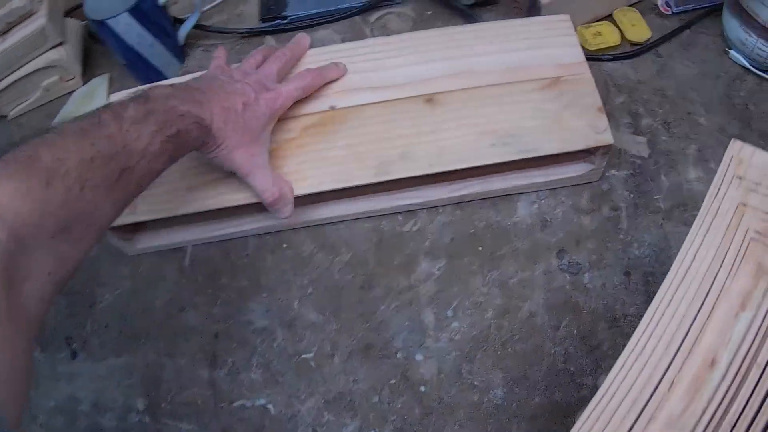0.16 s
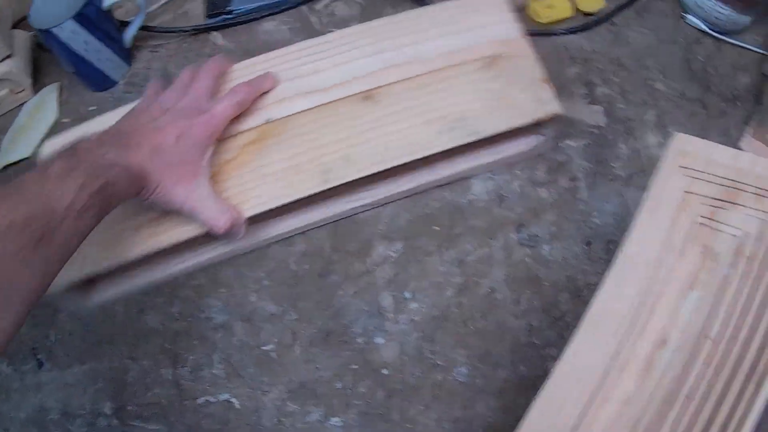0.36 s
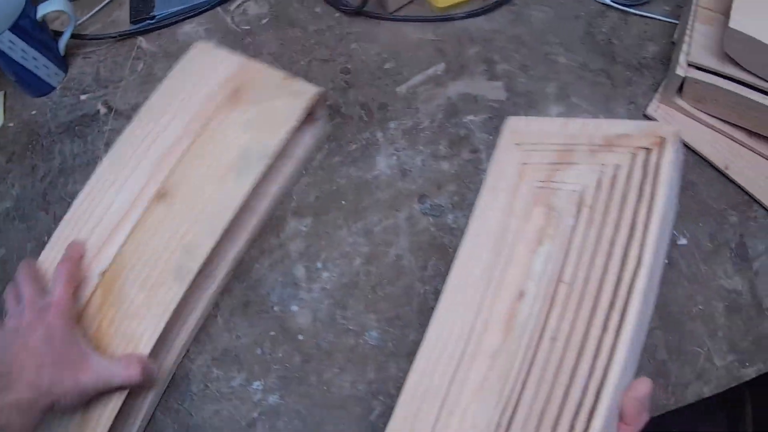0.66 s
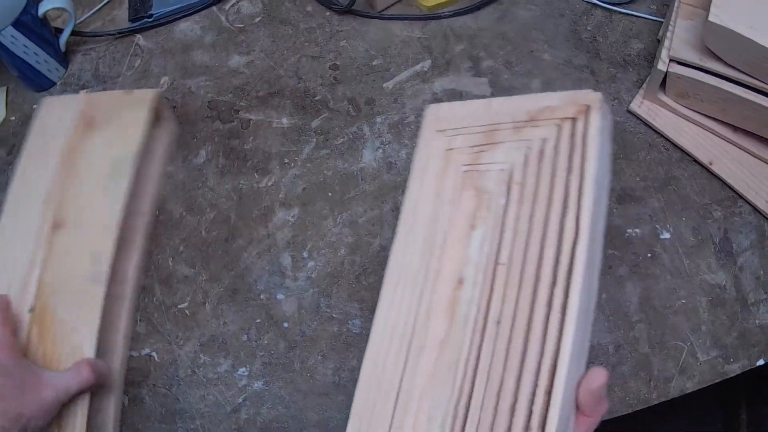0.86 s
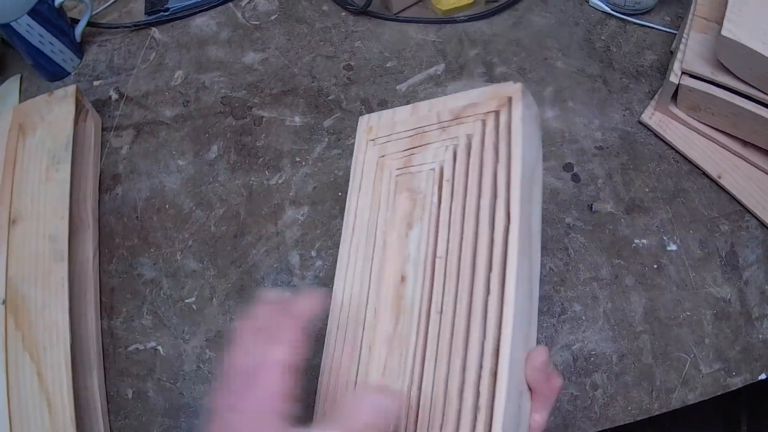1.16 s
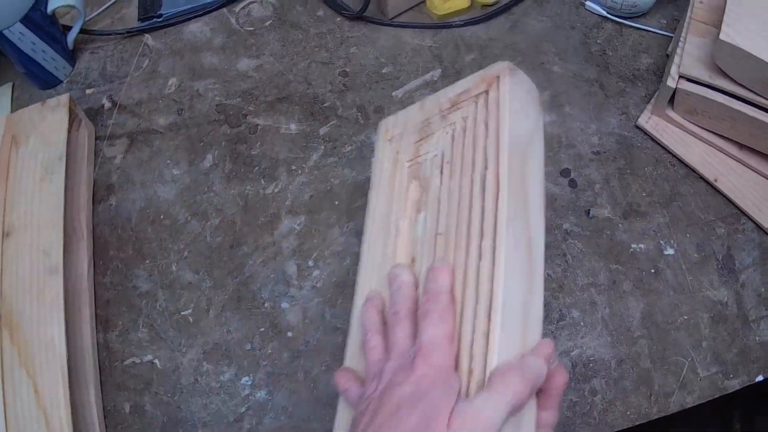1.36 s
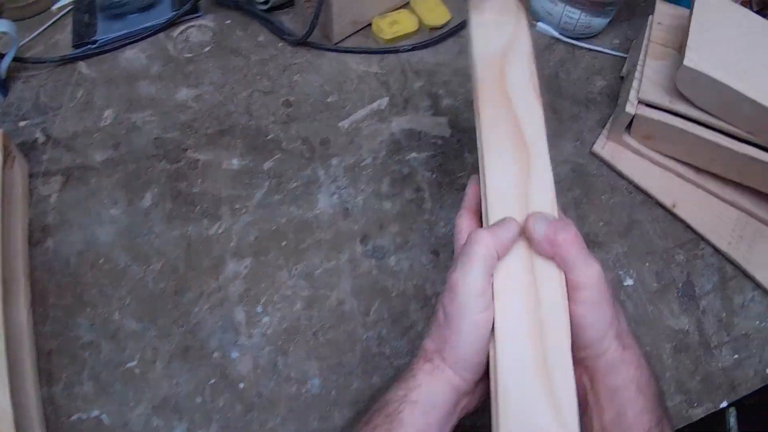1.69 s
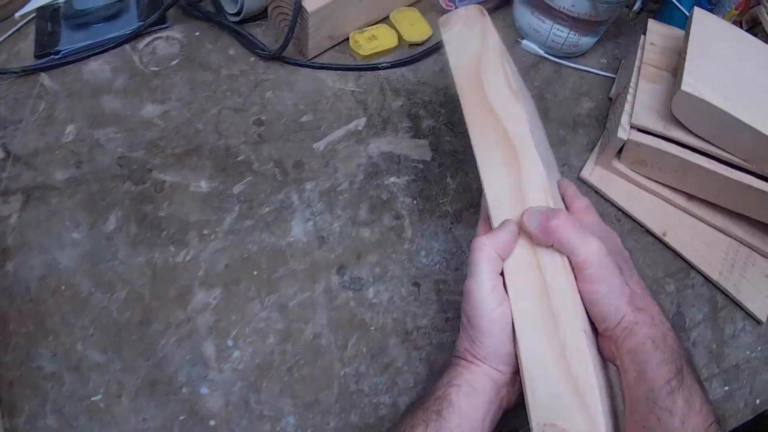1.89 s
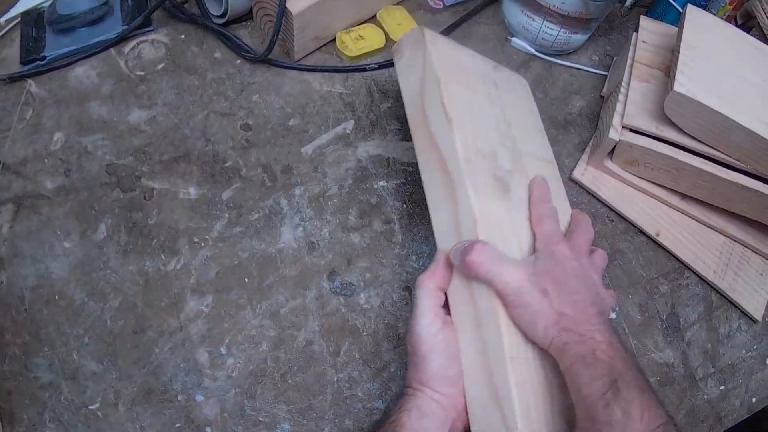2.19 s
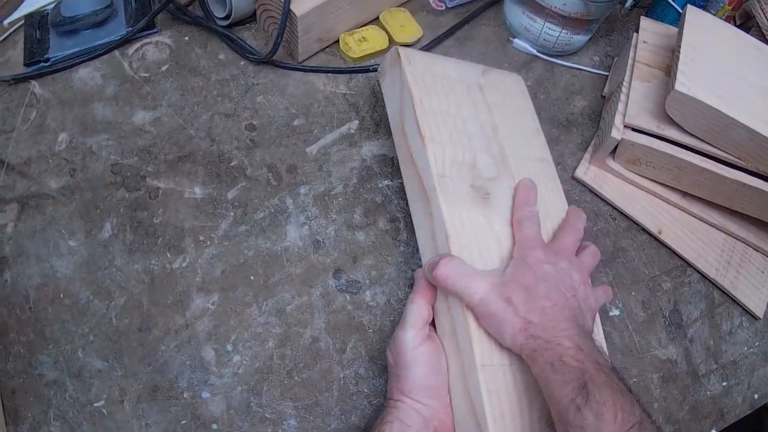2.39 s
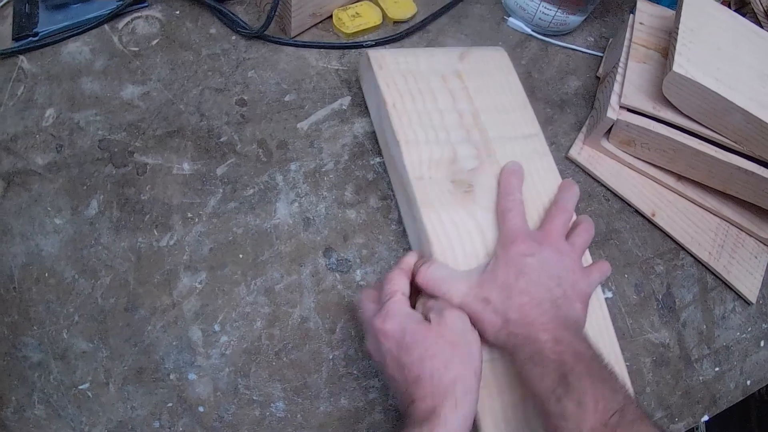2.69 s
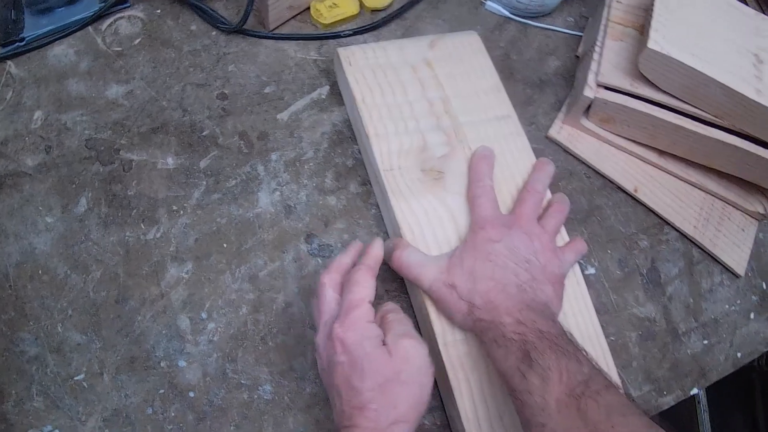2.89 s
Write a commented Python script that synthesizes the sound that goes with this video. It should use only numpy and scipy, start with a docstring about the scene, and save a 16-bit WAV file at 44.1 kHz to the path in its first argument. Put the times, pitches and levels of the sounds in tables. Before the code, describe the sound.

Wood scrapes and knocks on a workbench, close up in a small, fairly dry workshop. A hollow tray chatters along as a stack of trays swishes nearer; the stack is tipped with two knocks, skids, and claps down loudly.

```python
"""A small, fairly dry workshop, one microphone close to a gritty workbench.
A hollow wooden tray is dragged across it, groaning, chattering and bumping, while a solid stack of
trays is drawn closer with a swish. Hands brush the wood. The stack is tipped on edge with two knocks,
skids, and falls flat with a loud clap that leaves a tool ringing faintly.
Still air and a faint electrical whine lie behind it all."""
import sys
import numpy as np
from scipy import signal
from scipy.fft import rfft, irfft
from scipy.io import wavfile
from scipy.ndimage import uniform_filter1d

SR = 44100
rng = np.random.default_rng(int(sys.argv[2]) if len(sys.argv) > 2 else 0)


def pcm_store(signal):
    """Save signal as 16-bit PCM."""
    levels = np.round(np.clip(np.atleast_2d(signal), -1, 1) * 32767)
    wavfile.write(sys.argv[1], SR, levels.astype(np.int16).T)


N = 134505

# modes of the hollow tray and of the solid stack: f/Hz, relative level/dB, t60/s
TRAY_MODES = [(119, -9, .2), (172, -9, .14), (237, -6, .14), (280, -7, .26), (370, -4, .36), (415, -4, .1),
              (447, -3, .11), (480, -8, .2), (585, -8, .19), (740, -15, .13), (1172, -5, .11),
              (1420, -10, .11), (1720, -10, .11), (1945, -16, .1)]
STACK_MODES = [(63, -17, .25), (124, -3, .2), (169, -5, .17), (267, 2, .125), (383, -1, .13), (478, 4, .14),
               (567, -5, .14), (653, -15, .07), (792, -13, .06), (950, -9, .06), (1105, -5, .07),
               (1310, -9, .07), (1450, -9, .08), (1750, -14, .09)]
# blows on the bench: t/s, thump/dB, boom/dB, body/dB, clack/dB, tick/dB, ring length factor
TRAY_BUMPS = [(.107, -63, -67, -49, -66, -78, 0.48), (.355, -56, -49.5, -38.5, -56, -52, 0.46),
              (.434, -59, -58, -35, -66, -75, 0.25), (.446, -50, -43, -33, -47, -59, 0.47),
              (.486, -58, -41, -40.5, -47, -59, 0.27), (.534, -64, -34, -31.5, -51, -70, 0.7),
              (.553, -46, -62, -69, -65, -71, 2.2), (.572, -61, -40, -36.5, -59, -51.5, 1.55),
              (.615, -56, -42, -47.5, -54, -51, 1.2), (.655, -66, -39.5, -33.5, -41.5, -53, 0.47),
              (.709, -43, -68, -32, -54, -62, 1.1), (.724, -53, -46, -30, -44.5, -57, 0.79),
              (.737, -38.5, -30.5, -32, -44, -55.5, 0.61), (.813, -53, -44, -48, -51, -72, 0.55),
              (.855, -50.5, -38.5, -44, -49, -93, 1.18), (.903, -51, -45, -33, -42.5, -44.5, 0.75),
              (1.012, -52, -36, -43.5, -64, -60.5, 0.71), (1.05, -46, -57, -46, -72, -65, 0.58),
              (1.106, -58, -52.5, -54.5, -58.5, -62, 0.82)]
STACK_KNOCKS = [(1.276, -70, -68, -58, -58.5, -72, 0.52), (1.877, -44.5, -34, -34.5, -34, -64, 0.35),
                (1.8805, -39.5, -28, -31.5, -31.5, -50, 0.77), (1.958, -51, -55, -43.5, -69, -76, 0.74),
                (2.002, -64, -56, -46.5, -62, -70, 0.23), (2.029, -57, -80, -38.5, -46, -53.5, 1.4),
                (2.036, -39, -38.5, -32.5, -33.5, -50.5, 0.46), (2.14, -58, -59, -53, -70, -74, 0.38),
                (2.335, -83, -80, -55, -54.5, -60, 1), (2.421, -88, -66, -45.5, -39.5, -90, 0.66),
                (2.468, -74, -56, -62, -75, -70, 1.35), (2.536, -70, -82, -54, -59, -79, 0.75),
                (2.575, -74, -55, -44.5, -46.5, -72, 0.85), (2.622, -77, -56, -45, -44, -53.5, 1.1),
                (2.7195, -51, -50, -34.5, -33.5, -41, 0.94), (2.732, -54, -44.5, -37, -32, -53.5, 1.08),
                (2.7685, -51, -62, -42, -28, -41.5, 0.85), (2.7705, -25, -20, -16, -24.5, -43.5, 0.58),
                (2.886, -72, -56, -42.5, -60.5, -93, 0.36)]
# borders between thump, boom, body, clack and tick: f/Hz
REGISTER_BORDERS = [190, 320, 700, 2400]
# the tray slides: t/s, rumble/dB, grit/dB
DRAG_LEVELS = [(.09, -53, -80), (.115, -72, -58.5), (.155, -50.5, -54.5), (.19, -70, -70), (.26, -74, -82),
               (.29, -63.5, -52.5), (.36, -49, -49.5), (.47, -46, -44), (.65, -41.5, -49),
               (.76, -54, -54.5), (.92, -49, -54.5), (1.0, -50, -60), (1.1, -83, -59.5), (1.14, -72, -100)]

# course of each rubbing sound: t/s, level/dB
GROAN_LEVEL = [(.265, -79), (.285, -49), (.31, -53), (.33, -34.5), (.345, -50), (.365, -40.5),
               (.395, -52.5), (.44, -34.5), (.47, -47), (.49, -31.5), (.515, -46), (.56, -32.5), (.61, -48),
               (.68, -52)]  # the tray's rim sticks and slips
SWISH_LEVEL = [(.6, -71), (.78, -53.5), (.87, -57), (.93, -49), (.97, -58), (1.05, -65.5), (1.13, -79)]  # the stack slides on its face
SKID_LEVEL = [(1.88, -67), (1.92, -53), (2.02, -50), (2.1, -62.5), (2.15, -56.5), (2.26, -53.5),
              (2.36, -52.5), (2.44, -58), (2.5, -63.5), (2.535, -60.5), (2.56, -50), (2.63, -44),
              (2.68, -36), (2.712, -42), (2.725, -37), (2.742, -35.5), (2.765, -51), (2.79, -77)]  # the stack skids on its edge
PALM_LEVEL = [(0, -68), (.06, -67), (.2, -75), (1.26, -95), (1.3, -62), (1.38, -56.5), (1.45, -67),
              (1.5, -65.5), (1.57, -59.5), (1.64, -69), (1.78, -73.5), (1.86, -73)]  # palms brush the wood
FINGER_LEVEL = [(1.6, -69), (1.68, -62.5), (1.78, -68), (1.87, -64.5), (1.9, -92)]  # a finger drags

# spectra: f/Hz, relative level/dB per Hz
WOOD_SPECTRUM = [(30, -46), (100, -18), (450, -11.5), (700, -1), (950, 1.5), (1600, 0.5), (2050, -12),
                 (2500, -22), (3200, -13.5), (4200, -30.5), (5500, -23.5), (12000, -36.5)]  # the wood's dense response between its modes
GRIT_SPECTRUM = [(25, -31), (60, -12), (200, -1), (600, 12), (1000, 4), (1700, 7), (2300, -5.5), (3300, 3),
                 (4200, -3.5), (5200, -14.5), (8000, -16), (10800, -16), (12200, -39)]  # grit under the tray
SNAP_SPECTRUM = [(300, -12), (1500, -23), (3200, 2), (5000, -4), (10500, -2), (13000, -8)]  # the tray's corner on one grain
SWISH_SPECTRUM = [(2000, 3), (5000, -7), (8000, -4), (10500, 1), (13000, -6.5)]  # the stack's face on the bench
SKID_SPECTRUM = [(35, -43), (60, -17), (112, -9), (262, -13), (328, -19.5), (548, -1), (613, -0.5),
                 (837, -6.5), (1280, -5.5), (1750, -7), (2290, -22), (3740, -17), (5720, -34), (12500, -39),
                 (16200, -60), (22000, -120)]  # the stack's edge on the bench
PALM_SPECTRUM = [(59, -40), (100, -14), (364, -25.5), (464, -7), (503, -5), (785, -2.5), (1220, 0),
                 (1760, 3), (2240, -13.5), (2980, -5.5), (12500, -31), (16200, -59), (22000, -120)]  # skin on wood
AIR_SPECTRUM = [(15, 10), (25, -3.5), (355, -3), (472, -0.5), (1000, -8.5), (1340, -3.5), (2310, -18),
                (3150, -18), (9390, -22), (11600, -20), (12500, -54), (16200, -70), (22000, -120)]  # room tone

# electrical whine in the background: f/Hz, level/dB
WHINE_TONES = [(4590, -89), (6900, -94), (9195, -97)]
# decay of the workshop's reflections: f/Hz, t60/s
ROOM_DECAY = [(60, 0.37), (400, .36), (1500, 0.24), (3500, 0.26), (12000, 0.45)]

JUDDER_DB, JUDDER_S = 3 / 2, .025  # depth and time scale of friction's unevenness


def tray():
    """Slips drive the hollow tray's modes and crunch the grit under it; it bumps on the way."""
    body = struck_wood(TRAY_MODES)
    drive = unit(friction()) * level(DRAG_LEVELS)
    rumble = signal.fftconvolve(drive, body / np.linalg.norm(body))[:N]
    grit = scrape(GRIT_SPECTRUM) * level(DRAG_LEVELS, column=2)
    return rumble + grit + blows(TRAY_BUMPS, TRAY_MODES)


def stack():
    """The solid stack swishes closer, knocks on its edge, skids and falls flat."""
    swish = scrape(SWISH_SPECTRUM) * level(SWISH_LEVEL)
    skid = scrape(SKID_SPECTRUM) * level(SKID_LEVEL)
    return swish + skid + blows(STACK_KNOCKS, STACK_MODES)


def blows(table, modes, low_hz=56.2, top_hz=4440, attack_s=.014):
    """Each blow rings the wood; where and how hard it lands sets the weight of each register."""
    out = np.zeros(N)
    edges = [low_hz, *REGISTER_BORDERS, top_hz]  # soft pine gives little below and above
    bands = [signal.butter(3, pair, "band", fs=SR, output="sos") for pair in zip(edges, edges[1:])]
    for start_s, *levels_db, ring in table:
        hit = struck_wood(modes, ring)
        for band, db in zip(bands, levels_db):
            register = signal.sosfilt(band, hit)
            attack_rms = np.std(register[:round(attack_s * SR)])
            add(out, start_s, amp(db) * register / attack_rms)
    return out


def struck_wood(modes, ring=1, clatter_db=-3, clatter_t60_s=.25, crack_db=-3.5, crack_s=.015):
    """Wood struck once: its modes over a dense clatter that starts with a crack and dulls as it dies."""
    t = np.arange(SR // 2) / SR
    tones = sum(damped_sine(t, hz, db, t60 * ring) for hz, db, t60 in modes)
    noise = colour(rng.standard_normal(len(t)), WOOD_SPECTRUM)
    clatter = fade(noise, lambda hz: ring * clatter_t60_s * (1 + hz / 700) ** -.22)
    crack = 1 + amp(crack_db) * np.exp(-t / crack_s)
    return unit(tones) + amp(clatter_db) * unit(clatter * crack)


def friction(slips_per_s=5000, spread_db=3):
    """Tiny slips of uneven size, clumped by a judder."""
    size = amp(spread_db * np.minimum(rng.exponential(1, N), 5))
    direction = rng.choice([-1, 1], N)
    slipping = rng.random(N) < slips_per_s / SR
    return size * direction * slipping * amp(JUDDER_DB * wander(JUDDER_S))


def scrape(spectrum, boards_db=-2, decay_s=.0041):
    """Friction heard directly and through many short resonances of the boards."""
    t = np.arange(4096) / SR
    slips = friction()
    ring = rng.standard_normal(len(t)) * np.exp(-t / decay_s)
    boards = signal.fftconvolve(slips, ring)[:N]
    return colour(unit(slips) + amp(boards_db) * unit(boards), spectrum)


def rim_groan(start_hz=420, sag_hz_per_s=77, jitter=.0651, jitter_s=.00631):
    """The tray's rim sticks and slips unevenly, sagging in pitch."""
    elapsed = np.arange(N) / SR - GROAN_LEVEL[0][0]
    hz = (start_hz - sag_hz_per_s * elapsed) * (1 + jitter * wander(jitter_s))
    tone = np.sin(2 * np.pi * np.cumsum(hz) / SR)
    judder = amp(JUDDER_DB * wander(JUDDER_S))
    return unit(tone * judder) * level(GROAN_LEVEL)


def corner_squeak(start_s=.31, end_s=.42, db=-49):
    """The tray's corner squeaks briefly, early in the drag."""
    progress = np.clip((np.arange(N) / SR - start_s) / (end_s - start_s), 0, 1)
    return amp(db) * np.sin(np.pi * progress) * fuzzy_tone(hz=1415, width_hz=120)


def corner_snap(start_s=.9025, db=-41.5, decay_s=.0066):
    """A corner of the tray snaps over a grain of grit: short and bright."""
    out, t = np.zeros(N), np.arange(SR // 10) / SR
    noise = colour(rng.standard_normal(len(t)), SNAP_SPECTRUM)
    add(out, start_s, amp(db) * np.exp(-t / decay_s) * noise)
    return out


def hands():
    """Palms brush planed wood and a finger drags with a soft hum."""
    palms = scrape(PALM_SPECTRUM) * level(PALM_LEVEL)
    finger = fuzzy_tone(hz=1280, width_hz=120) * level(FINGER_LEVEL)
    return palms + finger


def loose_tool(clap_s=2.772):
    """The clap shakes one faint ring out of a metal tool on the bench."""
    out, t = np.zeros(N), np.arange(SR) / SR
    add(out, clap_s, damped_sine(t, hz=1570, db=-67, t60_s=2.2))
    return out


def room(direct, db=-13.5, delay_s=.008):
    """Short, scattered reflections of the cluttered workshop reach the microphone a little later."""
    taps = rng.standard_normal(SR // 2) * (rng.random(SR // 2) < .1)
    echoes = fade(taps, lambda hz: value_at(ROOM_DECAY, hz))
    tail = np.r_[np.zeros(round(delay_s * SR)), echoes]
    return amp(db) * signal.fftconvolve(direct, tail / np.linalg.norm(tail))[:N]


def room_tone(air_db=-68.5):
    """Still workshop air and a faint electrical whine."""
    air = amp(air_db) * colour(rng.standard_normal(N), AIR_SPECTRUM)
    whine = sum(amp(db) * fuzzy_tone(hz, width_hz=70) for hz, db in WHINE_TONES)
    return air + whine


def amp(db):
    """Decibels to gain."""
    return 10 ** (np.asarray(db) / 20)


def unit(x):
    """Scales to rms 1."""
    return x / np.sqrt(np.mean(x ** 2) + 1e-20)


def value_at(table, hz):
    """Reads a table on a log-frequency axis."""
    f, value = np.transpose(table)
    return np.interp(np.log(hz + 1), np.log(f + 1), value)


def level(curve, column=1):
    """Gain over time from one dB column of a curve; silent outside it."""
    rows = np.array(curve)
    return amp(np.interp(np.arange(N) / SR, rows[:, 0], rows[:, column], left=-np.inf, right=-np.inf))


def colour(x, spectrum):
    """Gives x a spectrum, at rms 1."""
    gain = amp(value_at(spectrum, np.fft.rfftfreq(len(x), 1 / SR)))
    return unit(irfft(rfft(x) * gain, len(x)))


def damped_sine(t, hz, db, t60_s):
    """One mode ringing down."""
    return amp(db) * np.exp(-np.log(1000) * t / t60_s) * np.sin(2 * np.pi * hz * t)


def fuzzy_tone(hz, width_hz):
    """Noise in one narrow band, at rms 1."""
    detuning = 2 * (np.fft.rfftfreq(N, 1 / SR) - hz) / width_hz
    return unit(irfft(rfft(rng.standard_normal(N)) / (1 + detuning ** 2), N))


def wander(smooth_s):
    """Smooth random drift at rms 1."""
    span = round(smooth_s * SR)
    return unit(uniform_filter1d(uniform_filter1d(rng.standard_normal(N), span), span))


def fade(x, t60_of):
    """Lets each frequency of x die away at its own speed."""
    hz, t, frames = signal.stft(x, SR, nperseg=256)
    decay = np.exp(-np.log(1000) * t / t60_of(hz)[:, None])
    return signal.istft(frames * decay, SR, nperseg=256)[1][:len(x)]


def add(mix, start_s, sound):
    """Mixes a sound in at start_s."""
    part = mix[round(start_s * SR):][:len(sound)]
    part += sound[:len(part)]


def scene():
    """The bench close up, the workshop behind it, in mono."""
    bench = tray() + rim_groan() + corner_squeak() + corner_snap() + stack() + hands() + loose_tool()
    return (bench + room(bench) + room_tone())[None]


def record(dry):
    """The recorder cuts the treble above 12.8 kHz."""
    low_pass = signal.firwin(511, 12800, window=("kaiser", 9), fs=SR)
    return signal.oaconvolve(dry, low_pass[None], "same")


dry = scene()
out = record(dry)
pcm_store(out)
```